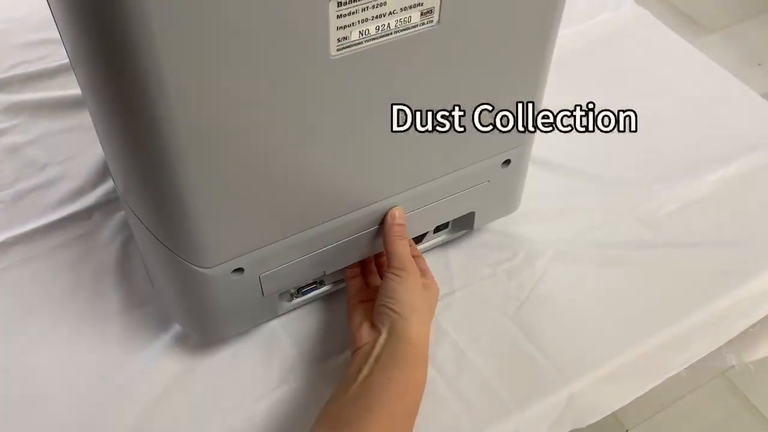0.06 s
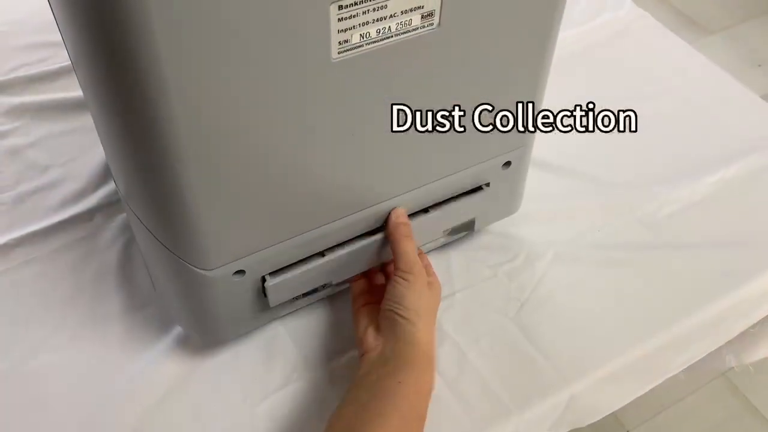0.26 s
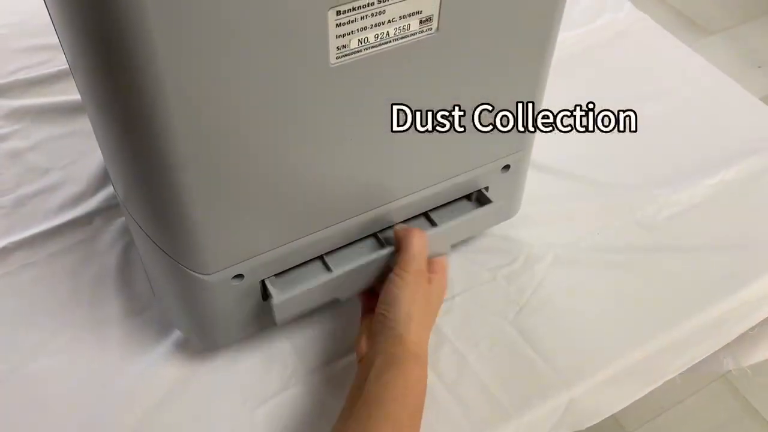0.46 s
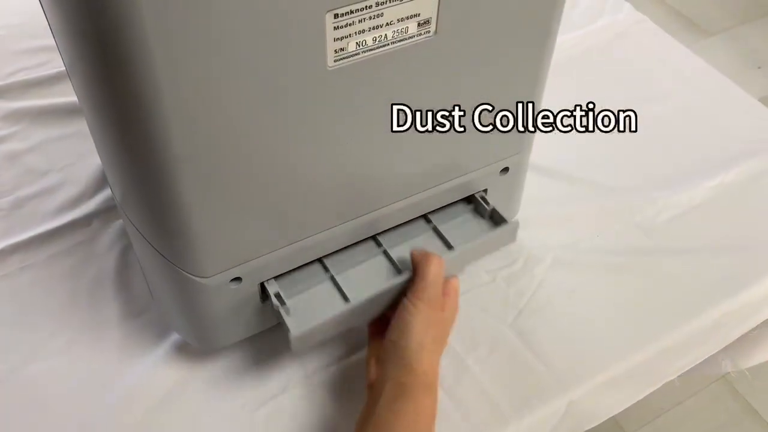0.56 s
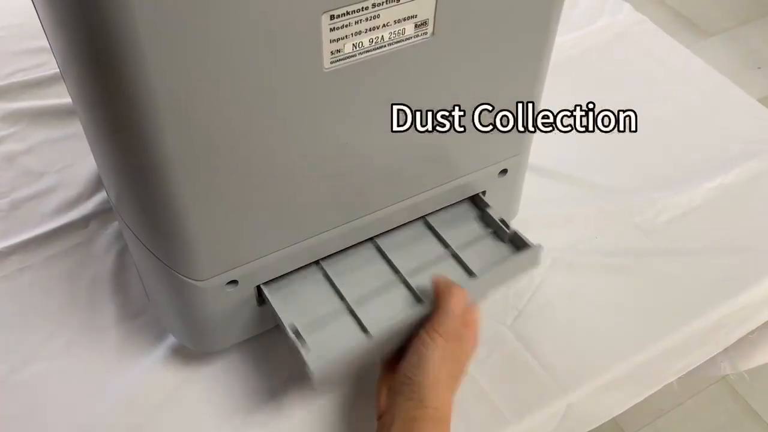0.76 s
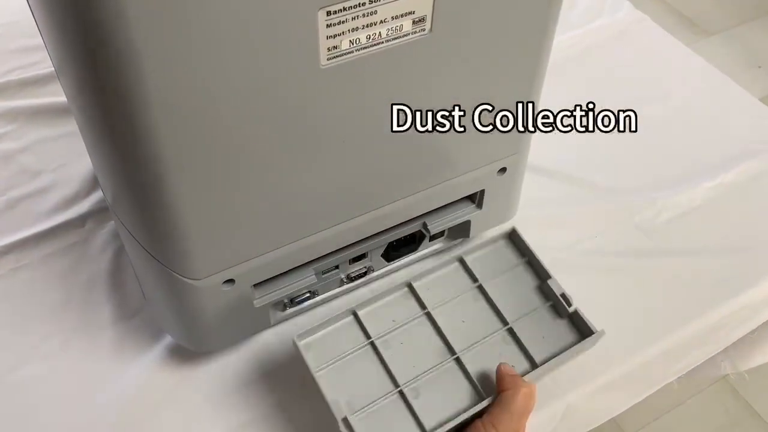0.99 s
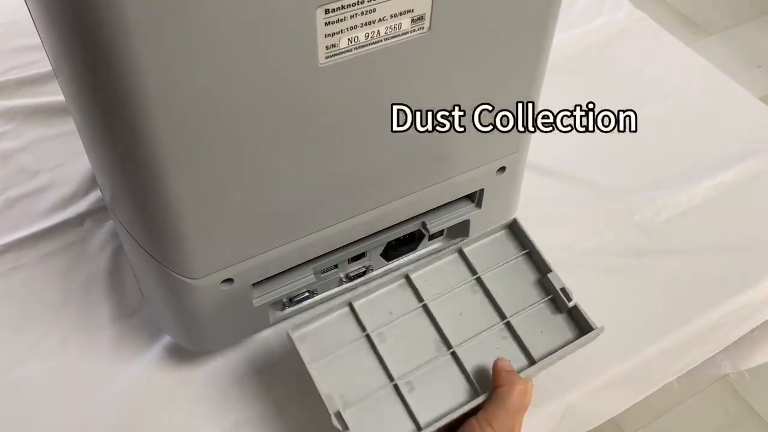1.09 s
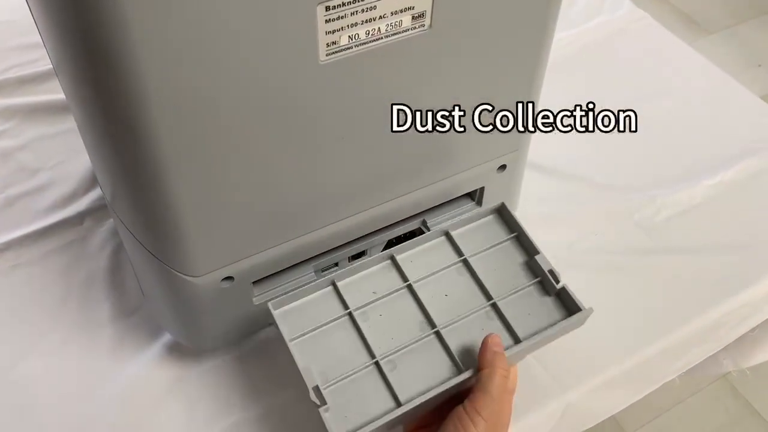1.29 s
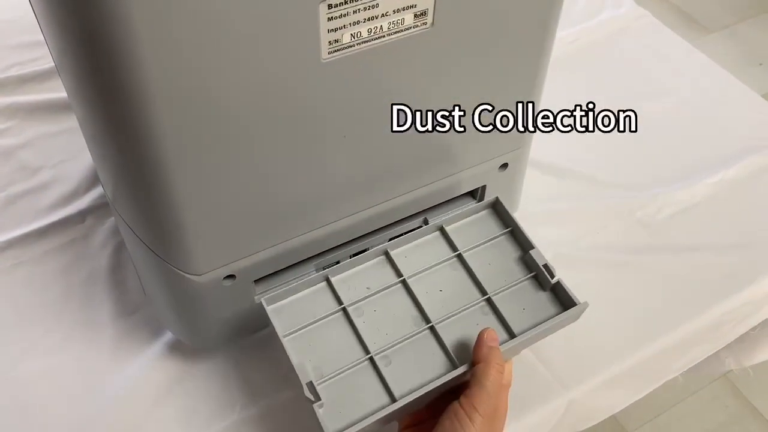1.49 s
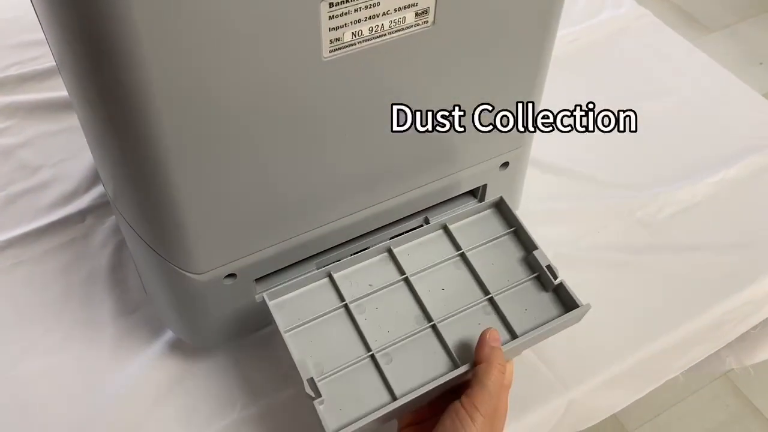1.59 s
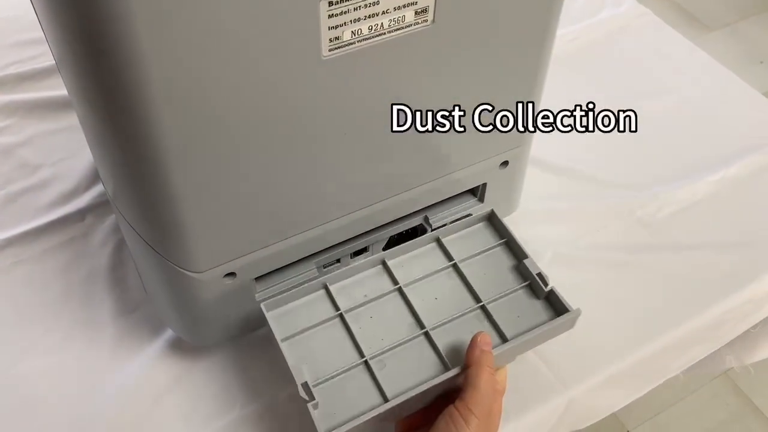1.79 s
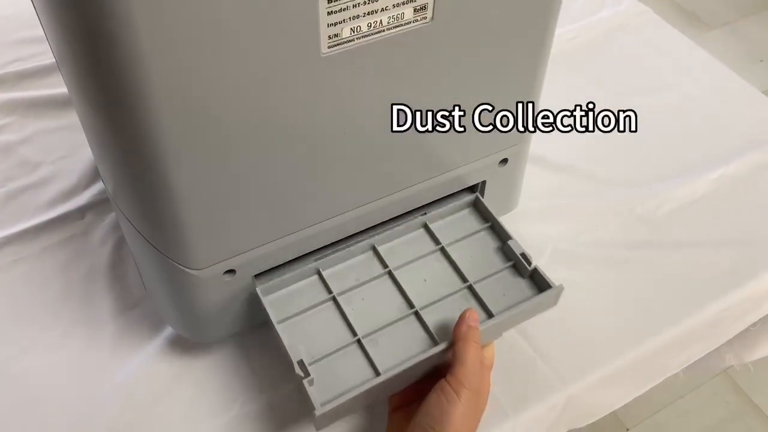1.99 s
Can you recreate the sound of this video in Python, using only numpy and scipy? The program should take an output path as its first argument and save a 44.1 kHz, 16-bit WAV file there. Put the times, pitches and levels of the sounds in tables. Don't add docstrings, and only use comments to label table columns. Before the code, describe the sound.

Light plastic tray unlatches with a sharp crack, then scrapes out of its slot in uneven pulls

```python
import sys
import numpy as np
from scipy import signal
from scipy.io import wavfile
from scipy.ndimage import uniform_filter1d

SR = 44100
rng = np.random.default_rng(int(sys.argv[2]) if len(sys.argv) > 2 else 0)


def digitize_waveform(pressure):
    field = np.atleast_2d(pressure).T
    bounded = np.clip(field, -1, 1)
    quanta = np.round(bounded * 32767).astype(np.int16)
    wavfile.write(sys.argv[1], SR, quanta)


def volts_from_decibels(level):
    exponent = np.asarray(level, float) / 20
    return 10 ** exponent


N = 90404

# time_s, friction_db, brightness_db, panel_weight_db
STROKES = [
    [(.217, -66, -36, 18), (.222, -39, 6, -0.5), (.25, -40.5, 1, 3), (.275, -45.5, 1, -3.5),
     (.31, -57.5, 1.5, 1), (.4, -61, -2, -3.5)],
    [(.408, -67, 10, -1), (.42, -47.5, 10, 9.5), (.445, -51.5, 0, 6), (.452, -49, 4, 12.5),
     (.462, -49.5, 1, 5), (.49, -54, 5, 2), (.52, -57, 7, 3.5), (.555, -57.5, 6, 4), (.575, -65.5, 8, -5)],
    [(.6, -63, 2.5, -1.5), (.64, -57, -1, 2.5), (.657, -73, 6.5, 5.5), (.72, -66, 2, 8.5)],
    [(.728, -50.5, 1.5, -1), (.755, -45, 6.5, -1), (.765, -42.5, 3.5, 2), (.795, -42, 6.5, -4.5),
     (.812, -44, 9, -3.5), (.823, -52.5, -9.5, -1), (.87, -67.5, 6.5, -3.5), (1.0, -68, 6, -1),
     (1.2, -86, 6, -12)],
]
# freq_hz, level_db_per_hz
RUB = [(150, 8), (520, -9.5), (750, -6), (1500, -12), (4200, -14.5), (7000, -17.5), (8400, -26),
       (12000, -21)]
# start_s, pitch_hz, knock_db, panel_db, edge_db
KNOCKS = [(0.2208, 1500, -44, -30, -28), (0.2234, 735, -27, -38.5, -48), (.229, 1160, -23.5, -45, -18.5),
          (0.2316, 694, -19.5, -27.5, -29.5), (0.2614, 1130, -20.5, -47, -38),
          (0.4168, 820, -25.5, -38, -34), (0.432, 730, -30, -45, -55), (.443, 940, -54, -47, -46),
          (0.4538, 1090, -27, -39, -34), (0.7379, 980, -29.5, -73, -45), (0.7592, 1070, -19.5, -31, -30.5),
          (0.7815, 1550, -31, -67, -34.5), (0.922, 935, -43, -80, -47), (0.9663, 940, -39.5, -51, -44.5),
          (1.0378, 800, -36, -59, -52.5), (0.224, 107, -34.5, -62, -61), (.243, 705, -42, -65, -61),
          (0.461, 152, -37, -50, -62)]
# freq_hz, level_db_per_hz
EDGE = [(900, -16), (2100, -10), (3100, -8), (4600, -14), (6800, -6), (8200, -33), (10500, -17.5),
        (13500, -28.5)]
# freq_hz, level_db, t60_s
PANEL = [(178, 2, 0.02), (266, -9.5, 0.016), (360, 4, 0.022), (670, -4.5, 0.028), (728.6, 2, 0.038),
         (932, -3, 0.024), (1077, 2.5, 0.014), (1380, -3.5, 0.0097), (1610, -5.5, 0.037), (2380, -8, 0.034),
         (2690, -15.5, 0.023), (2950, -13, 0.02), (4370, -16, 0.0077), (4800, -14, 0.013)]
# start_s, pitch_hz, level_db, t60_s
PINGS = [(.222, 5020, -34, 0.0092), (.2293, 4530, -23, 0.01), (0.2294, 1380, -22, 0.022),
         (.2335, 886, -25.5, 0.025), (.2295, 360, -28.5, 0.016), (0.2293, 11800, -39, 0.0069),
         (.2305, 9430, -38, 0.0063), (0.2346, 8300, -43, 0.013), (.2365, 2150, -38, 0.012),
         (.233, 550, -28.5, .015), (.2335, 1570, -30, 0.013), (.2625, 694, -29, 0.013),
         (0.2775, 3180, -38, 0.011), (0.4153, 8970, -44.5, 0.01), (.4315, 725, -31, 0.022),
         (0.4556, 6150, -41.5, 0.0099), (0.454, 585, -36.5, 0.034), (0.4589, 1080, -34, 0.024),
         (0.466, 1010, -52, 0.011), (.526, 6440, -47, .012), (.549, 4700, -54, 0.0092),
         (0.7283, 990, -36.5, 0.0093), (.737, 5620, -44, 0.0089), (.7415, 970, -31, 0.0069),
         (0.7438, 3120, -44, 0.023), (0.7587, 4145, -38.5, 0.033), (0.771, 4100, -32, 0.013),
         (.7825, 9270, -42.5, 0.0094), (0.767, 1300, -35, 0.009), (0.7821, 1615, -36, 0.011),
         (0.793, 1090, -27, 0.0039), (0.7943, 1520, -38, 0.0066), (0.7957, 5620, -40, 0.016),
         (0.796, 2720, -34, 0.022), (0.804, 2810, -31.5, 0.011), (0.773, 1450, -35, 0.011),
         (0.8068, 1290, -40, 0.0087), (.9225, 10700, -53.5, .008), (.925, 3160, -60, 0.0092),
         (0.9668, 910, -32.5, 0.0089), (.9668, 10500, -47, 0.01), (0.967, 7300, -51.5, .012),
         (.969, 4000, -51, 0.029), (0.965, 3080, -50, 0.013), (1.0377, 4800, -46, 0.009),
         (1.039, 4100, -52, .012), (1.0385, 1200, -51, 0.0091), (1.0378, 10300, -59, 0.011)]
# start_s, pitch_hz, level_db, t60_s
THUMPS = [
    (.245, 195, -34, 0.053),
    (.262, 330, -38, 0.033),
    (0.266, 149, -35, .04),
    (0.296, 292, -36.5, 0.045),
    (.452, 191, -42, 0.046),
    (.472, 140, -43, 0.055),
    (.528, 185, -41, 0.055),
    (0.804, 262, -32.5, 0.018),
    (.818, 169, -35, 0.035),
]
# start_s, level_db
TICKS = [(0.045, -67), (0.076, -68.5), (.525, -60), (0.659, -56.5), (0.672, -57), (0.686, -51.5),
         (0.704, -54), (.711, -51), (.901, -64), (0.951, -56), (0.965, -44.5), (1.161, -64.5),
         (1.18, -67.5)]
# freq_hz, t60_s
ROOM_T60 = [(200, 0.22), (1500, 0.25), (5000, 0.4), (12000, 0.069)]
# freq_hz, level_db_per_hz
AIR = [(30, -8), (106, -1), (330, -13), (530, -22.5), (2700, -37), (7200, -52.5), (9000, -66), (13500, -65)]
BAND_EDGES_HZ = 25 * 2 ** np.arange(0, 9.3, 0.4)

JERK_DB, JERKS_PER_S = 1.0, 60
SLIPS_PER_S, SLIP_SPREAD_DB = 9000, 1
CATCHES_PER_S, CATCH_SPREAD_DB = 450, 3.8
SLIP_PANEL_DB, SLIP_RUB_DB, SLIP_RIM_DB = 3, -6.5, -7
KNOCK_CYCLES, PANEL_PUSH_S = 7.0, 0.0035
ATTACK_S, CHATTER_S = 0.0006, 0.0024
RIMS, RIM_CYCLES, RIM_SPREAD_DB, CRACK_RIM_DB = 24, 24, 2.5, -7.5
PANEL_LOW_HZ = 129
PING_RISE = 0.21
TICK_HZ, TICK_S = 4300, 0.0033
THUD_S, THUD_HZ, THUD_DB, THUD_RISE_S, THUD_FALL_S = 1.548, 53.6, -37.5, 0.022, 0.0073
ROOM_DB, ROOM_LOW_HZ = -14.5, 312
AIR_DB = -50.5
MIC_LOW_HZ, CUTOFF_HZ = 44, 13500
TOP_LOW_HZ, TOP_HIGH_HZ, TOP_DB = 13750, 14150, -9
TOP_GATE_DB, TOP_HOLD_S = -90.5, 0.035


def slide():
    points = [row for stroke in STROKES for row in stroke]
    s, friction_db, bright_db, weight_db = np.transpose(points)
    t = np.arange(N) / SR
    jerk = rms_one(band(rng.standard_normal(N), 4.7, JERKS_PER_S))
    gain = volts_from_decibels(np.interp(t, s, friction_db, left=-120, right=-120) + JERK_DB * jerk)
    bright = np.interp(t, s, bright_db)
    weight = np.interp(t, s, weight_db)
    slips = grains(SLIPS_PER_S, SLIP_SPREAD_DB, count=4)
    catches = grains(CATCHES_PER_S, CATCH_SPREAD_DB, count=1)[0]

    body = rms_one(panel(lambda k: np.roll(slips[k % 2], 1009 * k) * gain))
    body = body * np.sqrt(np.mean(gain ** 2))
    rings = rims(lambda k: np.roll(catches, 2003 * k) * gain * volts_from_decibels(bright), RUB)
    rub = 4.74 * gain * colour(slips[2:], RUB, bright)
    return volts_from_decibels(SLIP_PANEL_DB + weight) * body + volts_from_decibels(SLIP_RUB_DB) * rub + volts_from_decibels(SLIP_RIM_DB) * rings


def knocks():
    s, pitch_hz, knock_db, panel_db, edge_db = np.transpose(KNOCKS)
    count = len(s)

    share = volts_from_decibels(rng.normal(0, 0.93, (count, len(PANEL))))
    rim_share = volts_from_decibels(rng.normal(0, RIM_SPREAD_DB, (count, RIMS)))
    push = bursts(s, panel_db - 23, np.full(count, PANEL_PUSH_S))
    chatter = grains(6000, 0.5, count=2)
    body = panel(lambda k: (share[:, k] @ push) * np.roll(chatter[k % 2], 97 * k))

    hollow = np.zeros(N)
    for start, hz, db in zip(s, pitch_hz, knock_db):
        click = -volts_from_decibels(db) * (np.arange(N) == int(start * SR) + 30)
        hollow += band(ring(click, hz, KNOCK_CYCLES / hz), 0.5 * hz, 2 * hz)

    crack = bursts(s, edge_db + 4.0, np.full(count, CHATTER_S))
    grit = grains(12000, 1.04, count=2)
    rings = rims(lambda k: (rim_share[:, k] @ crack) * np.roll(grit[k % 2], 53 * k), EDGE)
    return body + hollow + colour(crack.sum(0) * grit, EDGE) + volts_from_decibels(CRACK_RIM_DB) * rings


def pings():
    out = np.zeros(N)
    for s, hz, db, t60 in [*PINGS, *THUMPS]:
        t = np.maximum(np.arange(N) / SR - s, 0)
        swell = 1 - np.exp(-t / (PING_RISE * t60))
        out += volts_from_decibels(db + 10 - 60 * t / t60) * swell * np.sin(2 * np.pi * hz * t)
    return out


def ticks():
    s, db = np.transpose(TICKS)
    envelope = bursts(s, db, np.full(len(s), TICK_S)).sum(0)
    return band(envelope * rng.standard_normal(N), TICK_HZ, 14000)


def thud():
    t = np.arange(N) / SR - THUD_S
    width = np.where(t < 0, THUD_RISE_S, THUD_FALL_S)
    return -volts_from_decibels(THUD_DB) * np.exp(-0.5 * (t / width) ** 2) * np.cos(2 * np.pi * THUD_HZ * t)


def room(x):
    t = np.arange(SR // 2) / SR
    white = rng.standard_normal((2, len(t)))
    tail = np.zeros(len(t))
    for k, (low, high) in enumerate(zip(BAND_EDGES_HZ, BAND_EDGES_HZ[1:])):
        decay = volts_from_decibels(-60 * t / at_hz(ROOM_T60, np.sqrt(low * high)))
        tail += band(white[k % 2], low, high) * decay
    tail = tail * np.clip(t / 0.002, 0, 1)
    tail = tail / np.sqrt(np.sum(tail ** 2))
    return volts_from_decibels(ROOM_DB) * signal.fftconvolve(band(x, ROOM_LOW_HZ, 15700), tail)[:N]


def air():
    noise = rng.standard_normal((2, N + SR // 2))
    return volts_from_decibels(AIR_DB) * rms_one(colour(noise, AIR)[-N:])


def panel(force):
    out = sum(volts_from_decibels(db) * ring(force(k), hz, t60) for k, (hz, db, t60) in enumerate(PANEL))
    return signal.sosfilt(signal.butter(2, PANEL_LOW_HZ, "high", fs=SR, output="sos"), out)


def rims(force, spectrum):
    pitches = np.geomspace(1500, 12500, num=RIMS) * volts_from_decibels(rng.normal(0, 0.12, size=RIMS))
    out = 0
    for k, hz in enumerate(pitches):
        level = volts_from_decibels(at_hz(spectrum, hz)) * np.sqrt(hz / SR)
        out = out + level * ring(force(k), hz, RIM_CYCLES / hz)
    return out


def ring(force, hz, t60):
    r, w = volts_from_decibels(-60 / (t60 * SR)), 2 * np.pi * hz / SR
    return signal.lfilter([0, np.sin(w)], [1, -2 * r * np.cos(w), r * r], force + 1e-18)


def bursts(s, db, length_s):
    t = np.maximum(np.arange(N) / SR - np.asarray(s)[:, None], 0)
    fade = np.exp(-t / np.asarray(length_s)[:, None])
    return volts_from_decibels(db)[:, None] * fade * (1 - np.exp(-t / ATTACK_S))


def grains(per_s, spread_db, count):
    sizes = volts_from_decibels(spread_db * np.minimum(rng.exponential(1, (count, N)), 5))
    signs = rng.choice([-1, 1], (count, N))
    return rms_one(sizes * signs * (rng.random((count, N)) < per_s / SR))


def colour(pair, spectrum, tilt_db=0):
    out = 0
    for k, (low, high) in enumerate(zip(BAND_EDGES_HZ, BAND_EDGES_HZ[1:])):
        hz = np.sqrt(low * high)
        octaves_under = max(np.log2(spectrum[0][0] / hz), 0)
        tilt = tilt_db * max(np.log2(hz / 1000), 0) / 3
        level_db = at_hz(spectrum, hz) - 23 * octaves_under + tilt
        out = out + volts_from_decibels(level_db) * band(pair[k % 2], low, high)
    return out


def band(x, low_hz, high_hz):
    return signal.sosfilt(signal.butter(2, [low_hz, high_hz], "band", fs=SR, output="sos"), x + 1e-18)


def at_hz(points, hz):
    points = np.array(points)
    return np.interp(np.log(hz), np.log(points[:, 0]), points[:, 1])


def rms_one(x):
    return x / np.sqrt(np.mean(x ** 2) + 1e-20)


def scene():
    tray = slide() + knocks() + pings() + ticks()
    return (tray + room(tray) + thud() + air())[None]


def top_cut(x):
    return signal.sosfilt(signal.butter(12, 14130, fs=SR, output="sos"), x)


def record(dry):
    dry = signal.sosfilt(signal.butter(3, MIC_LOW_HZ, "high", fs=SR, output="sos"), dry)
    main = signal.sosfilt(signal.cheby2(12, 60, CUTOFF_HZ, fs=SR, output="sos"), dry)
    top = volts_from_decibels(TOP_DB) * band(band(dry, TOP_LOW_HZ, TOP_HIGH_HZ), TOP_LOW_HZ, TOP_HIGH_HZ)
    power = uniform_filter1d(top ** 2, size=int(TOP_HOLD_S * SR))
    top = top * power ** 2 / (power ** 2 + volts_from_decibels(4.0 * TOP_GATE_DB))
    return top_cut(top + main)


dry = scene()
out = record(dry)
digitize_waveform(out)
```